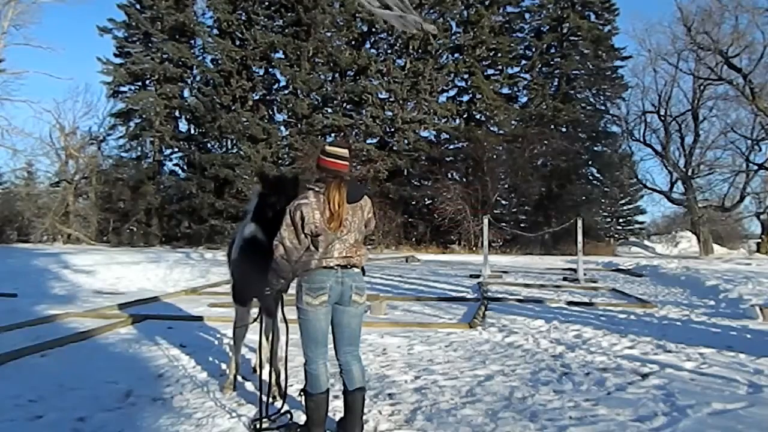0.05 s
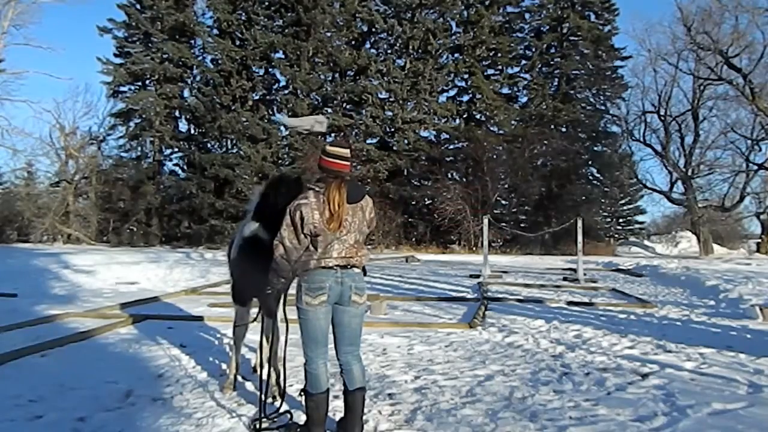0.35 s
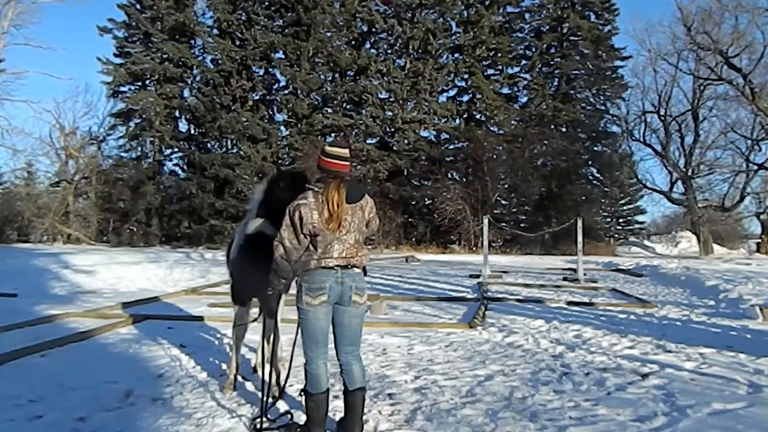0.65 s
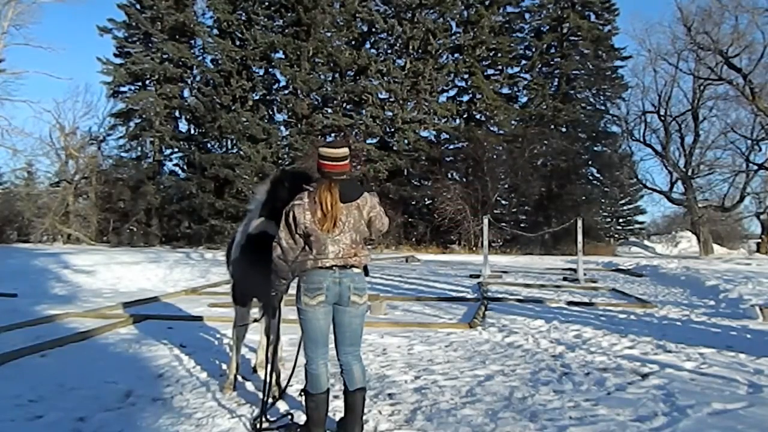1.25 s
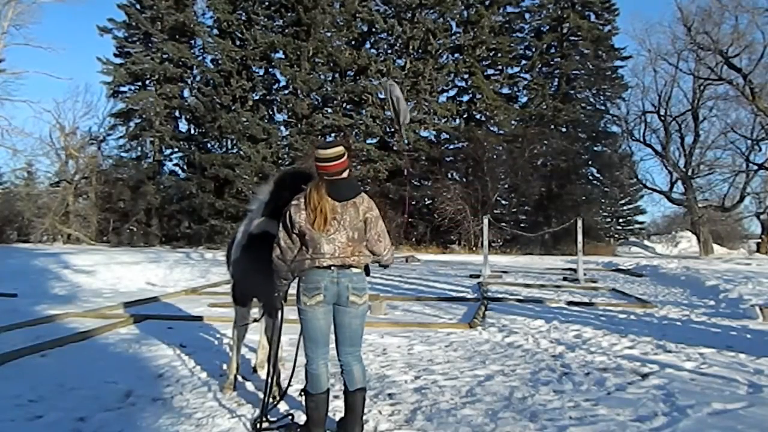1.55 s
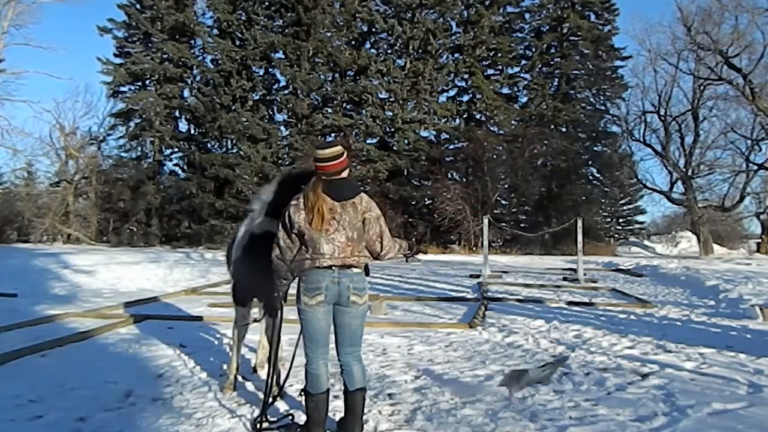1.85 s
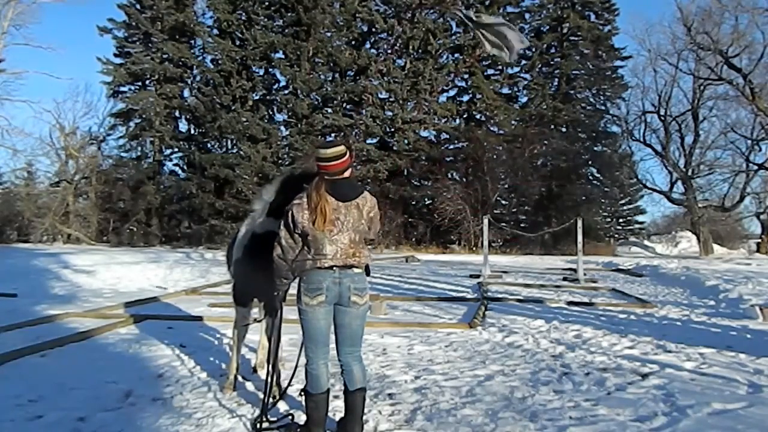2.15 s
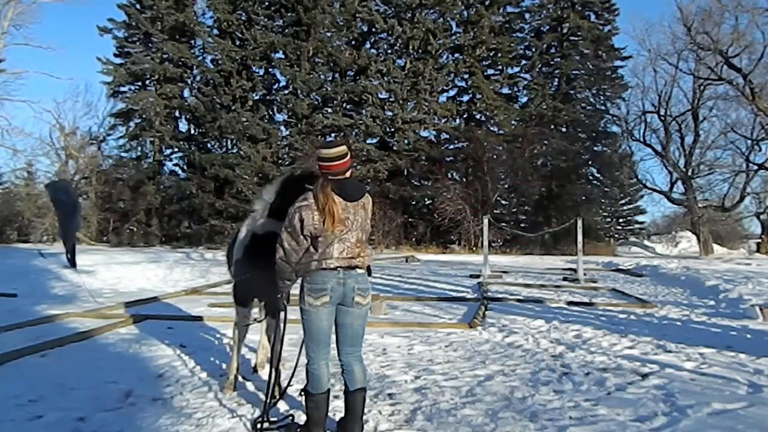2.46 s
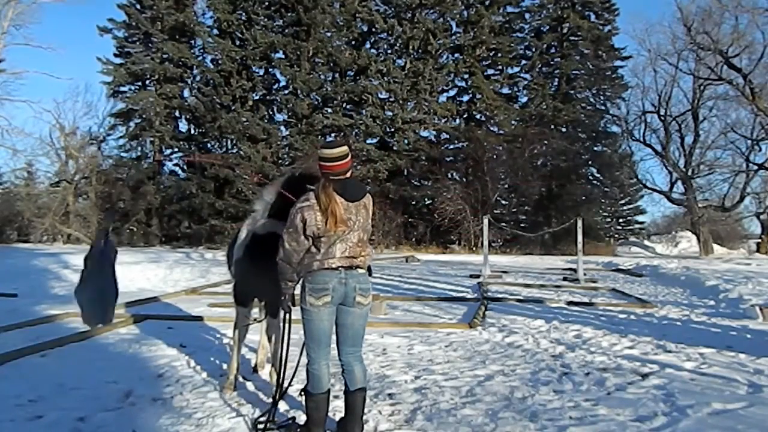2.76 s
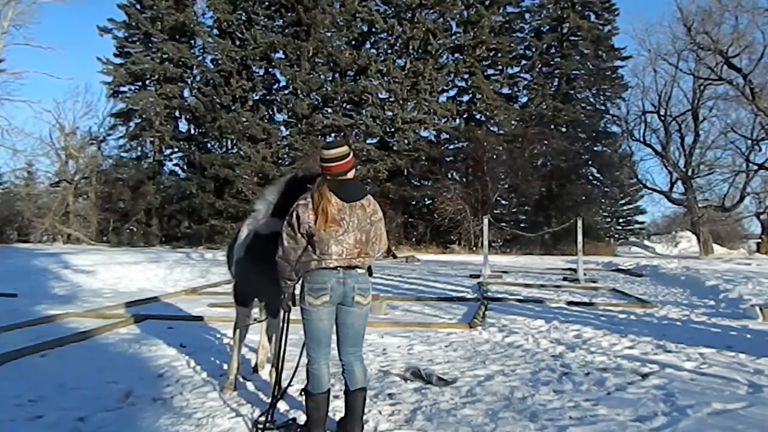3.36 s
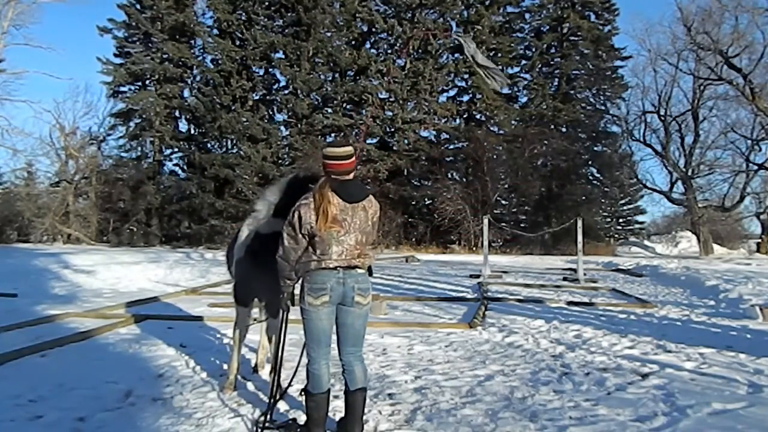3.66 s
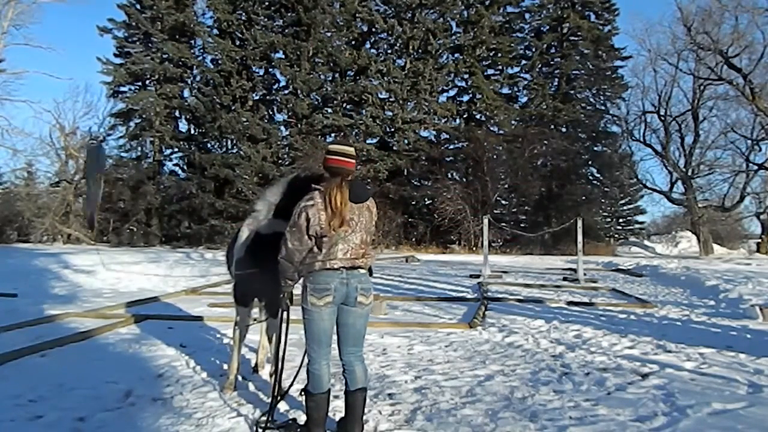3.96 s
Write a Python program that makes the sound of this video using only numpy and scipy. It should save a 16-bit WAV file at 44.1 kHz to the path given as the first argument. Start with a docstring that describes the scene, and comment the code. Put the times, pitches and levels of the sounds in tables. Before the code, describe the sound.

A plastic bag rustles and whooshes as it is swung around, with wind rumbling on the microphone.

```python
"""Plastic bag whirled on a whip

A plastic bag on the end of a whip is swung round outdoors, over snow. Its film flutters and crinkles
in the air stream, rustling all the time and flaring into a hissing whoosh at each fast stroke.
Wind rumbles on the microphone and single eddies thump against it, over a faint distant hush."""
import sys
import numpy as np
from scipy.fft import rfft, irfft, next_fast_len
from scipy.io import wavfile
from scipy.ndimage import map_coordinates

SR = 44100
rng = np.random.default_rng(int(sys.argv[2]) if len(sys.argv) > 2 else 0)


def digitize_waveform(pressure):
    """Quantize a signal to 16-bit integers and store it at the path in sys.argv[1].

    Rows of a 2-D input are taken as channels; values are limited to [-1, 1].
    """
    field = np.atleast_2d(pressure).T
    bounded = np.clip(field, -1, 1)
    quanta = np.round(bounded * 32767).astype(np.int16)
    wavfile.write(sys.argv[1], SR, quanta)


N = 176400


def bag():
    """Incoherent addition: rustle and strokes sum in power, separately in a dull and a bright band."""
    # rustle in flight: (time [s], level [dB], brightness [dB])
    flight = [(0, -49.5, -5.5), (.15, -38, 2.5), (.25, -43.5, 7), (.4, -40.5, -1.5), (.5, -51.5, -2.5),
              (.62, -52.5, -1), (.77, -46, -2), (.88, -60, 4), (.96, -52, 6), (1.0, -41.5, 4),
              (1.19, -44, -0.5), (1.29, -39, 1.5), (1.37, -44, 0.5), (1.5, -39, 2.5), (1.58, -46.5, 0.5),
              (1.66, -37.5, -0.5), (1.79, -42.5, -3), (1.9, -34, -2.5), (2.0, -43, -2), (2.1, -41, -5),
              (2.17, -48.5, 2), (2.24, -41, 1), (2.33, -45.5, 2), (2.38, -42.5, -3), (2.62, -46, -3),
              (2.74, -40, 3), (2.8, -47, 0), (2.89, -40, 0), (3.0, -45.5, 1.5), (3.08, -46, 2),
              (3.24, -41.5, 3.5), (3.34, -42, -1), (3.39, -48, -3), (3.53, -41.5, 1.5), (3.7, -48, -5.5),
              (3.79, -48.5, 0), (3.86, -58, -2), (4, -60, -2)]
    # fast strokes: (peak time [s], level [dB], rise [s], fall [s], brightness [dB])
    strokes = [(.372, -31, 0.015, 0.013, 3), (.732, -39, 0.0089, 0.021, 4), (1.027, -33, 0.023, 0.016, 3),
               (1.599, -36.5, .005, 0.0051, -5), (1.716, -29, 0.03, 0.027, -1),
               (1.862, -27.5, .015, 0.019, -2), (2.56, -39.5, 0.037, 0.026, -0.5),
               (2.704, -28.5, 0.015, 0.017, -1), (2.845, -36, 0.028, 0.028, 0.5),
               (2.935, -30.5, 0.01, .03, -2), (3.12, -40.5, 0.022, 0.031, 6),
               (3.17, -38.5, 0.044, 0.018, 2.5), (3.288, -38, 0.012, 0.037, 0.5),
               (3.474, -31, 0.022, .03, -2.5), (3.573, -36.5, 0.0087, 0.037, -3)]
    # hiss of the film: (frequency [Hz], relative spectral density [dB])
    hiss_spectrum = [(530, -41), (900, -9), (1130, -8), (1540, -2.5), (2220, -1.5), (3030, -3.5),
                     (3710, -2.5), (3990, -3.5), (6270, -2), (8050, -0.5), (9070, 0), (13600, -7),
                     (15500, -15.5)]
    # low rush of air under the hiss: (frequency [Hz], relative spectral density [dB])
    rush_spectrum = [(150, -30), (400, -6.5), (800, -5), (1200, -17), (2500, -51)]
    swell_exponent, crossover_hz, rush_db = 1.85, 5940, -18
    t = np.arange(N) / SR
    level_db, brightness_db = curves(flight)
    tilt = np.array([[-.5], [.5]])  # brightness lowers the dull band and lifts the bright one
    power = amp(level_db + tilt * brightness_db) ** 2
    for time, db, rise, fall, brightness in strokes:
        distance = np.abs(t - time) / np.where(t < time, rise, fall)
        swell = np.exp(-distance ** swell_exponent)
        power += (amp(db + tilt * brightness) * swell) ** 2
    dull_gain, bright_gain = np.sqrt(power)
    crinkle = film()
    hiss = coloured(crinkle, hiss_spectrum)
    dull = filtered(hiss, lambda hz: 1 / (1 + (hz / crossover_hz) ** 4))
    rush = amp(rush_db) * coloured(crinkle, rush_spectrum)
    return dull_gain * (dull + rush) + bright_gain * (hiss - dull)


def film():
    """Amplitude modulation: the flapping film shakes a mix of smooth hiss and tiny snapping creases."""
    snaps_per_s, spread_db, snaps_db = 3500, 3.5, -3
    flutter_per_s, flutter_db = 170, 1.35
    snaps = (rng.random(N) < snaps_per_s / SR) * rng.standard_normal(N)
    snaps *= amp(spread_db * np.clip(rng.standard_normal(N), -2, 2))
    crinkle = rng.standard_normal(N) + amp(snaps_db) * unit(snaps)
    return crinkle * amp(flutter_db * wobble(flutter_per_s))


def creases():
    """Shot noise: single creases snap at random, and stand out when the slowing bag masks them less."""
    # snap of a crease: (frequency [Hz], relative spectral density [dB])
    snap_spectrum = [(500, -30), (1500, -12), (4000, -3.5), (9000, 2.5), (13000, -3), (16000, -14)]
    snaps_per_s, rms_db, spread_db, decay_s = 65, -59.5, 3, .001
    snaps = np.zeros(N + SR)
    t = np.arange(SR // 100) / SR
    for i in np.flatnonzero(rng.random(N) < snaps_per_s / SR):
        size = amp(spread_db * np.clip(rng.standard_normal(), -2, 2))
        snaps[i:i + len(t)] += size * np.exp(-t / decay_s) * rng.standard_normal(len(t))
    return amp(rms_db) * coloured(snaps[:N], snap_spectrum)


def buffets():
    """Turbulence on several scales: each strong eddy thumps inside a slow push, among smaller eddies."""
    # strong eddies at the microphone: (time [s], peak level [dB], centre frequency [Hz])
    eddies = [(.067, -16, 150), (.137, -13, 75.6), (0.169, -22, 310), (.216, -15, 140), (.252, -14, 180),
              (0.36, -7.5, 125), (.613, -15, 80.5), (.653, -15.5, 157), (.722, -16.5, 169),
              (.812, -17.5, 132), (.923, -12.5, 208), (.963, -10, 186), (.972, -8.5, 95),
              (1.014, -10.5, 214), (1.11, -13, 183), (1.289, -9, 220), (1.298, -11, 121),
              (1.393, -20.5, 170), (1.419, -11, 167), (1.446, -14.5, 180), (1.613, -9.5, 186),
              (1.628, -12.5, 265), (1.648, -15, 179), (1.718, -14, 172), (1.777, -13, 193),
              (1.793, -13.5, 221), (1.806, -15.5, 195), (2.145, -12.5, 75), (2.375, -13, 200),
              (2.463, -11.5, 189), (2.534, -4, 159), (2.574, -8, 232), (2.587, -17, 300), (2.642, -19, 230),
              (2.662, -6.5, 289), (2.684, -14, 235), (2.783, -15, 143), (2.8, -14, 85), (2.9, -17, 204),
              (3.269, -16, 212), (3.648, -18, 90), (3.681, -21.5, 190), (3.945, -22.5, 91)]
    push_db, push_ratio = -7, .52  # level and frequency relative to the strong eddy
    wake_spacing_s, wake_db, wake_step_db, wake_ratio = .00699, -6.5, -3, .78
    pressure = np.zeros(N)
    for time, db, hz in eddies:
        phase = 2 * np.pi * rng.random()
        add_eddy(pressure, time, db, hz, phase)
        add_eddy(pressure, time, db + push_db, hz * push_ratio, phase + np.pi / 2)
        for place in (-1, 1, 2):  # one weaker, lower eddy before and two after
            jitter, turn = rng.random(2)
            small_time = time + wake_spacing_s * (place + jitter - .5)
            small_db = db + wake_db + wake_step_db * (abs(place) - 1)
            add_eddy(pressure, small_time, small_db, hz * wake_ratio ** abs(place), 2 * np.pi * turn)
    return pressure


def add_eddy(track, time, db, hz, phase):
    """Pressure pulse: a passing eddy adds a single swing centred on its time, steeper when strong."""
    soft_db, soft_roundness, sharpening_per_db = -17.5, 3.01, .15
    centre, reach = int(time * SR), SR // 20
    i = np.arange(max(centre - reach, 0), min(centre + reach, N))
    angle = 2 * np.pi * hz * (i / SR - time)
    roundness = max(soft_roundness - sharpening_per_db * max(db - soft_db, 0), 1)  # 1 is a sharp knock
    pulse = np.exp(1j * phase) / (1 - 1j * angle / roundness) ** (roundness + 1)
    track[i] += amp(db) * pulse.real


def wind():
    """Turbulent pressure on the microphone: lumpy rumble, with stray eddies that follow its strength."""
    # strength of the wind: (time [s], level [dB])
    strength = [(0, -26.5), (.2, -25.5), (.38, -28), (.44, -29.5), (.52, -29.5), (.62, -26.5), (.69, -32.5),
                (.8, -27.5), (1.1, -28), (1.36, -26.5), (1.55, -28.5), (1.66, -27.5), (1.86, -26),
                (1.92, -32.5), (2.02, -31.5), (2.11, -24.5), (2.3, -28), (2.48, -21.5), (2.62, -25),
                (2.78, -25.5), (2.97, -30.5), (3.14, -30), (3.33, -29), (3.46, -26), (3.56, -33),
                (3.65, -28), (3.73, -33.5), (3.86, -34.5), (4, -30.5)]
    # wind rumble: (frequency [Hz], relative spectral density [dB])
    rumble_spectrum = [(12, -3.5), (25, -4), (40, 1), (75, 3.5), (120, -2.5), (180, -6), (260, -12.5),
                       (400, -23.5), (600, -34.5), (1000, -51), (2000, -75)]
    gusts_per_s, gust_db = 35, 2.0
    strays_per_s, stray_range_db, stray_hz = 45, 10, 144
    level_db, = curves(strength)
    rumble = coloured(rng.standard_normal(N), rumble_spectrum)
    rumble *= amp(gust_db * wobble(gusts_per_s))
    strays = np.zeros(N)
    for when, size, pitch, turn in rng.random((int(strays_per_s * N / SR), 4)):
        db = level_db[int(when * N)] + stray_range_db * (size - .5)
        add_eddy(strays, when * N / SR, db, stray_hz * 2 ** (pitch - .5), 2 * np.pi * turn)
    return amp(level_db) * unit(rumble) + strays


def open_air():
    """Stationary noise: the distant outdoor hush keeps a constant level and spectrum."""
    # distant hush: (frequency [Hz], relative spectral density [dB])
    hush_spectrum = [(200, 3.5), (600, 11), (1500, 4), (4000, -2), (9000, -32), (16000, -56)]
    return amp(db=-57.5) * coloured(rng.standard_normal(N), hush_spectrum)


def amp(db):
    """Amplitude ratio of a level in decibels."""
    return 10 ** (np.asarray(db) / 20)


def unit(x):
    """Normalisation to rms 1."""
    return x / np.sqrt(np.mean(x ** 2) + 1e-20)


def curves(rows):
    """Linear interpolation: one value per sample for each column after the time."""
    times, *columns = np.transpose(rows)
    return [np.interp(np.arange(N) / SR, times, column) for column in columns]


def wobble(rate):
    """Smooth random modulation: a spline through rate Gaussian knots a second."""
    return map_coordinates(rng.standard_normal(N // 20), [np.arange(N) * rate / SR], mode="mirror")


def filtered(x, response):
    """Linear filtering: the spectrum of x times a frequency response."""
    size = next_fast_len(N + SR // 2)
    return irfft(rfft(x, size) * response(np.fft.rfftfreq(size, 1 / SR)), size)[..., :N]


def coloured(x, points):
    """Spectral shaping of x by (frequency [Hz], gain [dB]) points, scaled to rms 1."""
    knots_hz, db = np.transpose(points)
    return unit(filtered(x, lambda hz: amp(np.interp(np.log(hz + 1), np.log(knots_hz + 1), db))))


def scene():
    """Superposition: open air, bag and wind add in one channel."""
    return (open_air() + bag() + wind() + buffets() + creases())[None]


def record(dry):
    """Band-stop and low-pass filtering: the camera cuts a narrow notch and all above its band limit."""
    notch_hz, half_width_hz, limit_hz = 7920, 63, 15780
    notch = lambda hz: 1j * (hz - notch_hz) / (1j * (hz - notch_hz) + half_width_hz)
    return filtered(dry, lambda hz: notch(hz) * (hz < limit_hz))


dry = scene()
out = record(dry)
digitize_waveform(out)
```